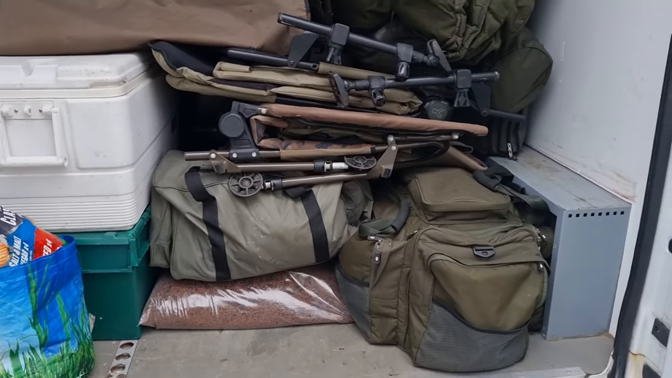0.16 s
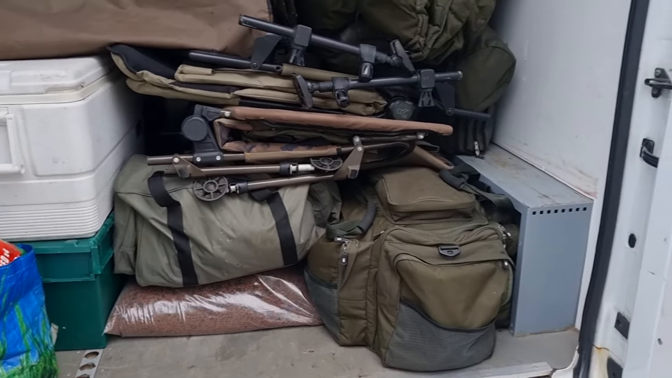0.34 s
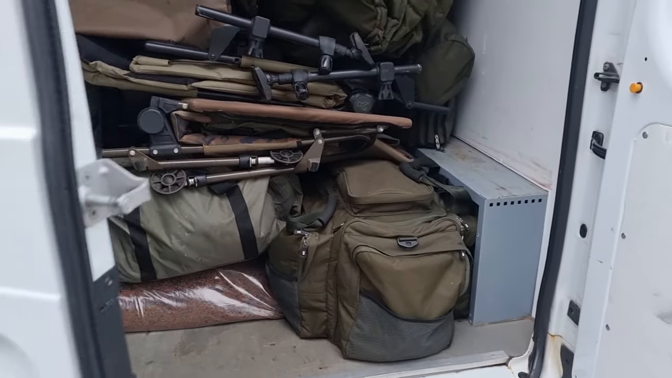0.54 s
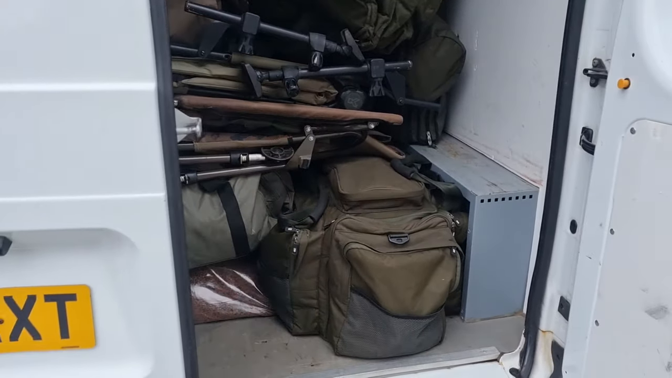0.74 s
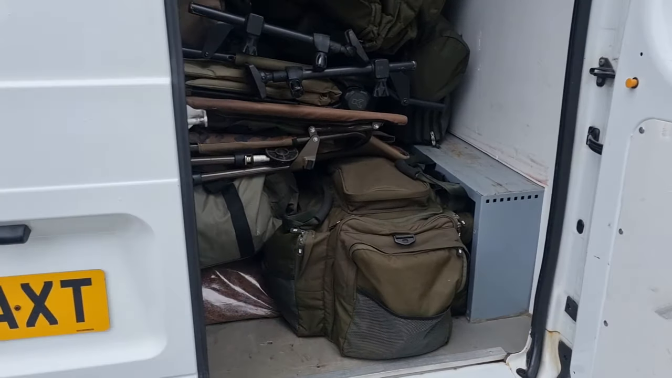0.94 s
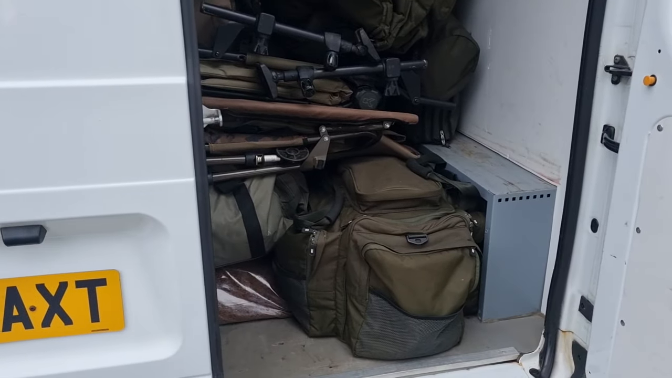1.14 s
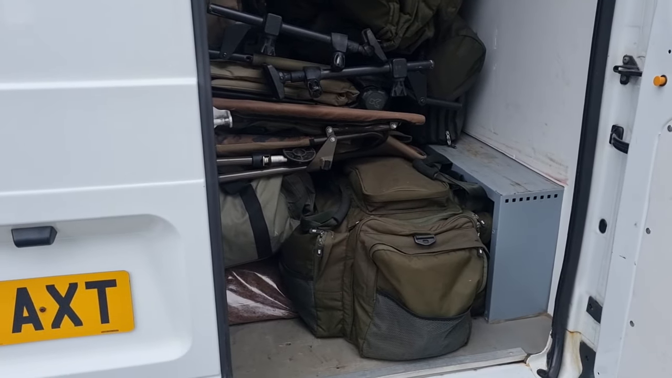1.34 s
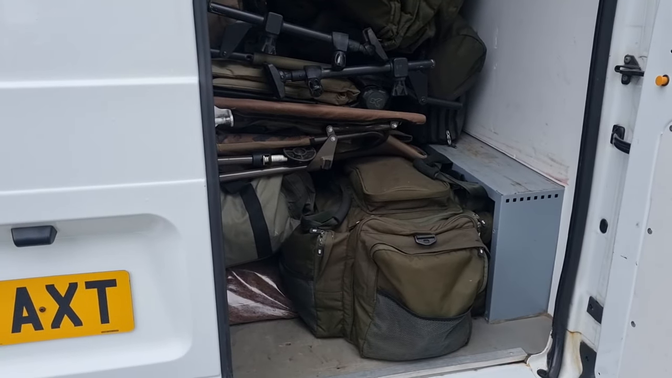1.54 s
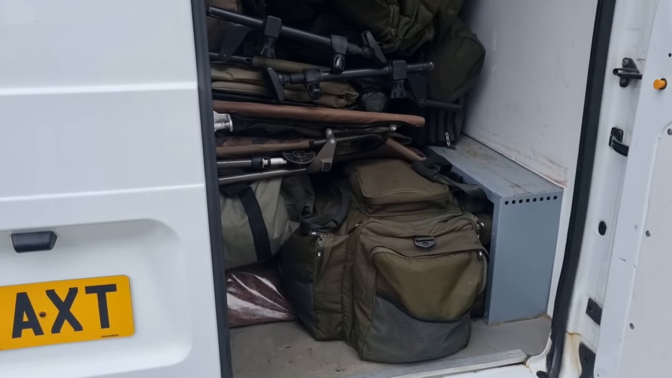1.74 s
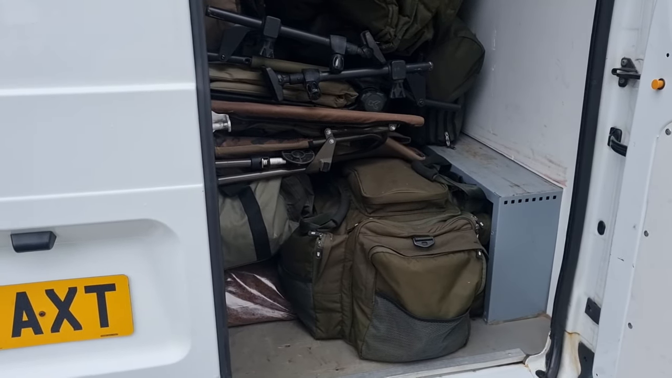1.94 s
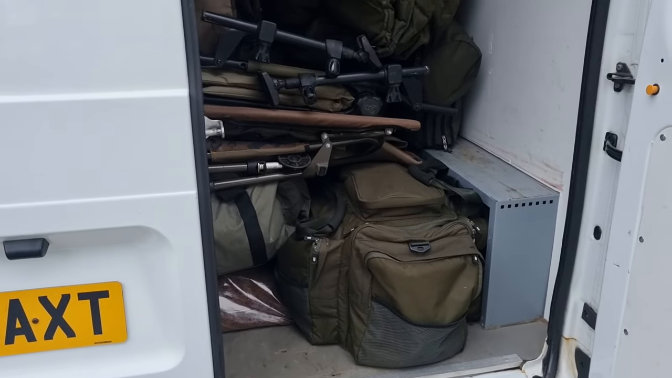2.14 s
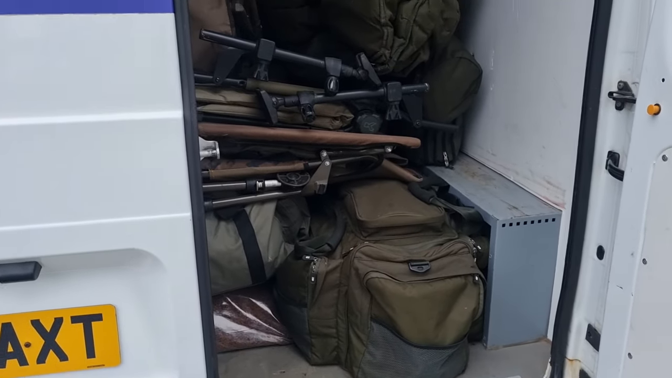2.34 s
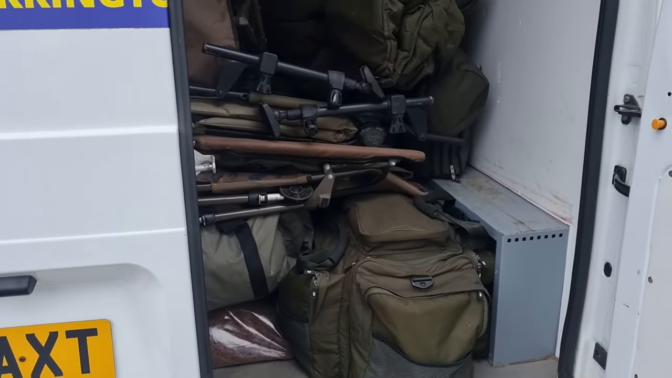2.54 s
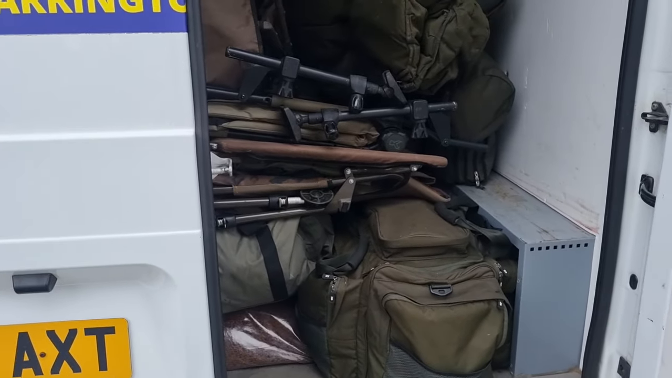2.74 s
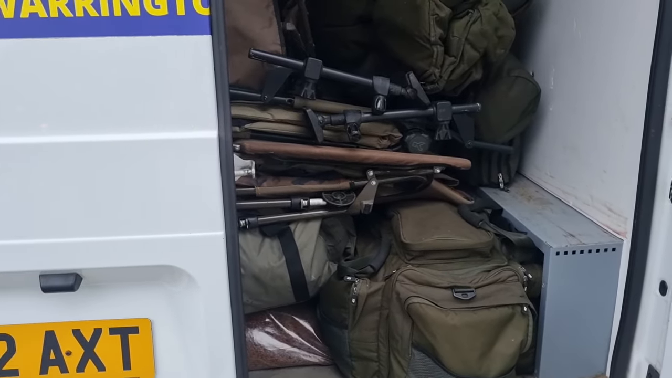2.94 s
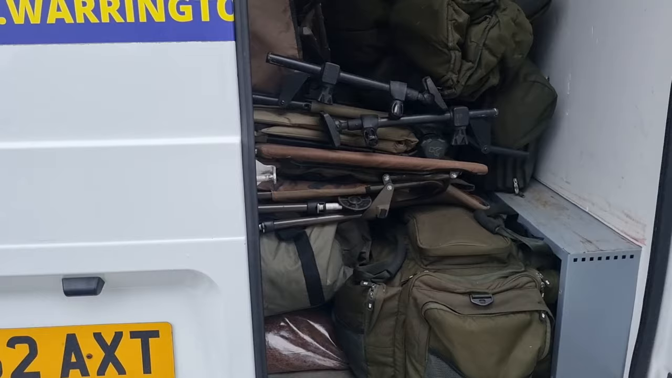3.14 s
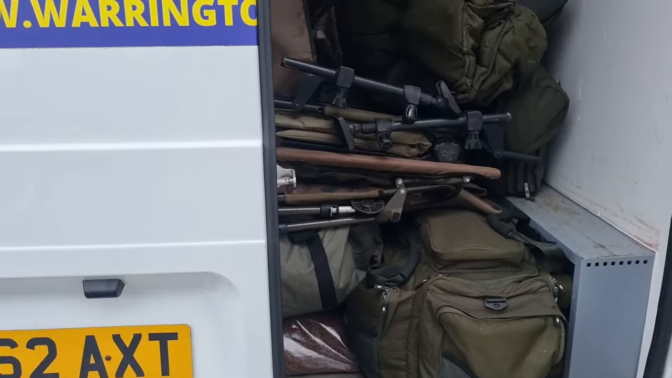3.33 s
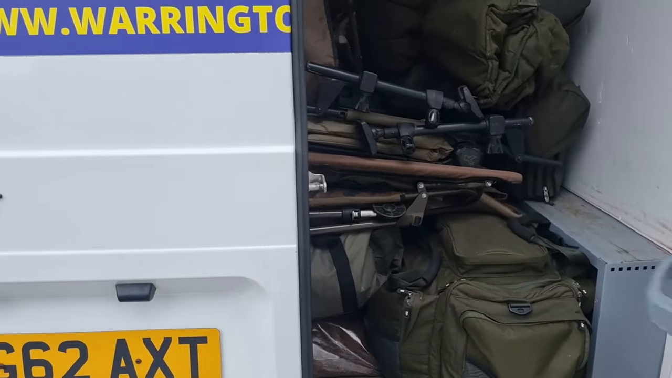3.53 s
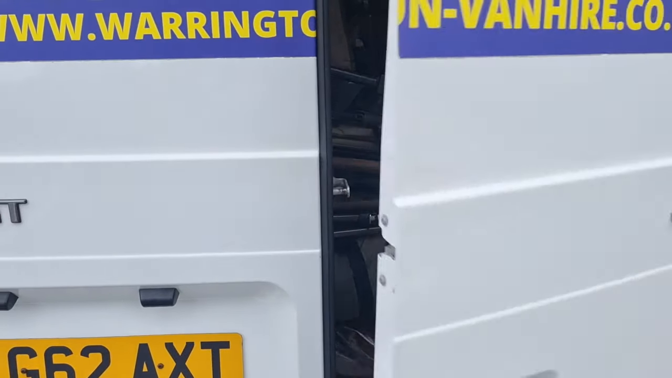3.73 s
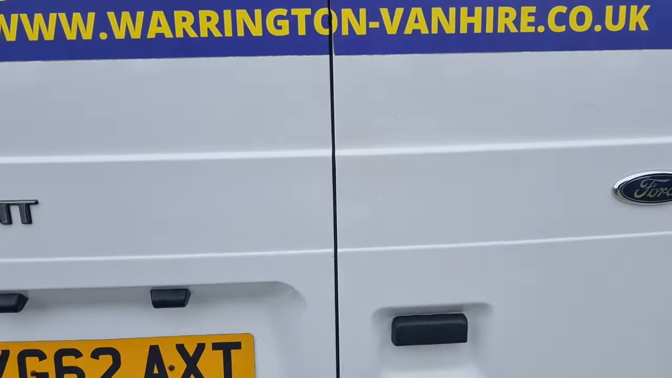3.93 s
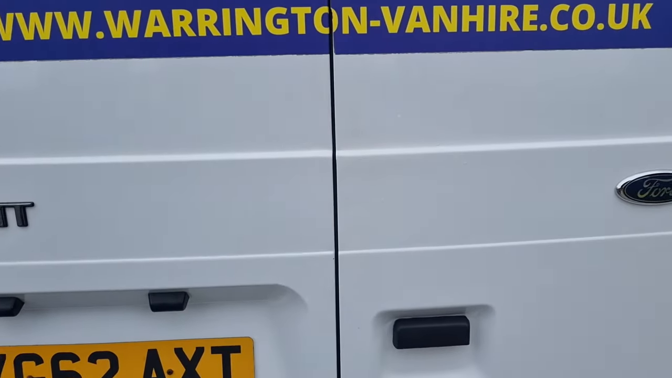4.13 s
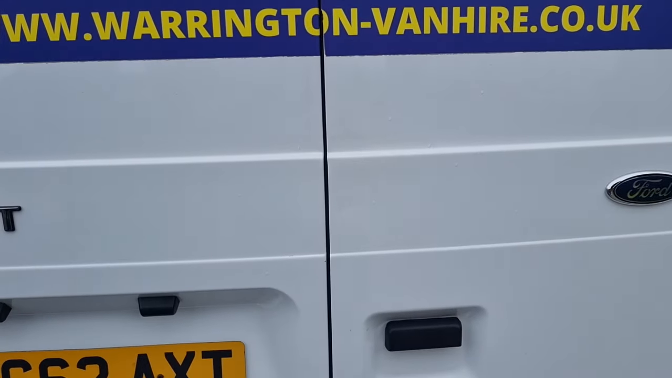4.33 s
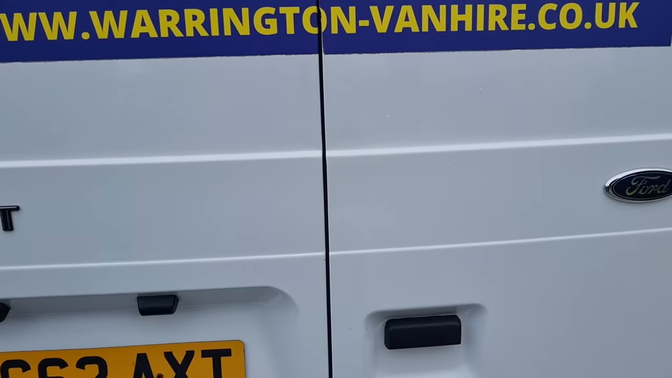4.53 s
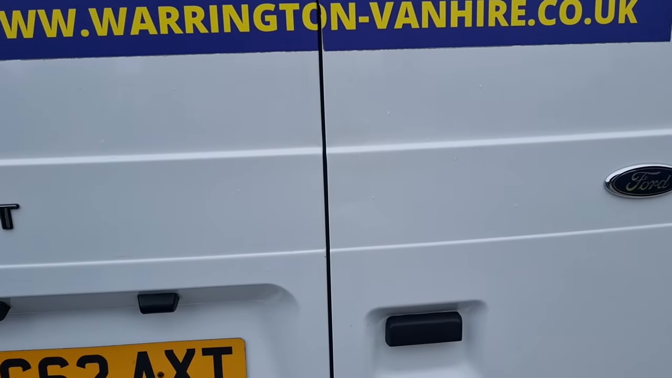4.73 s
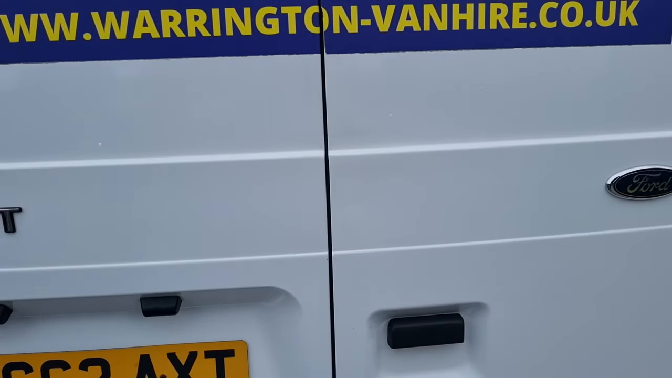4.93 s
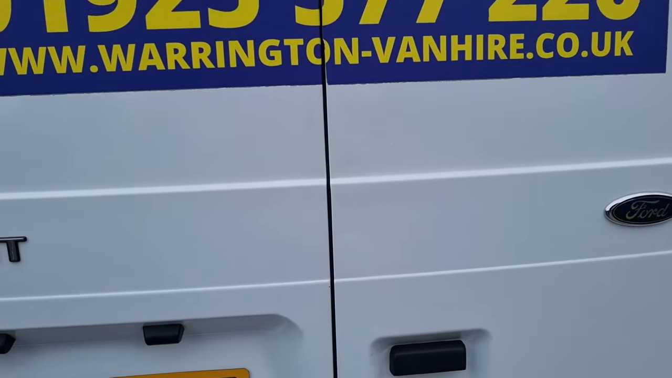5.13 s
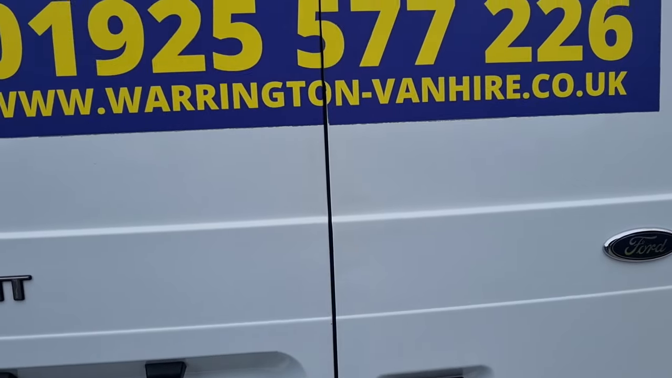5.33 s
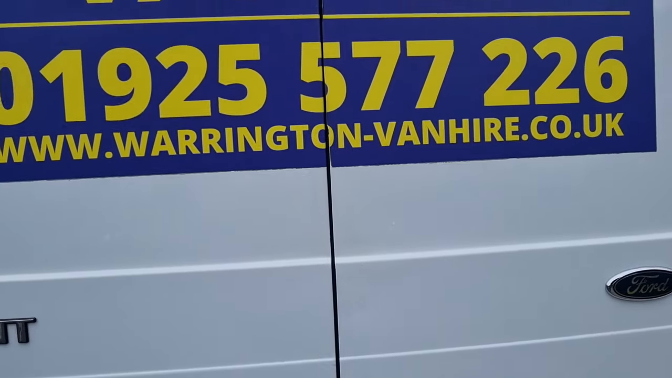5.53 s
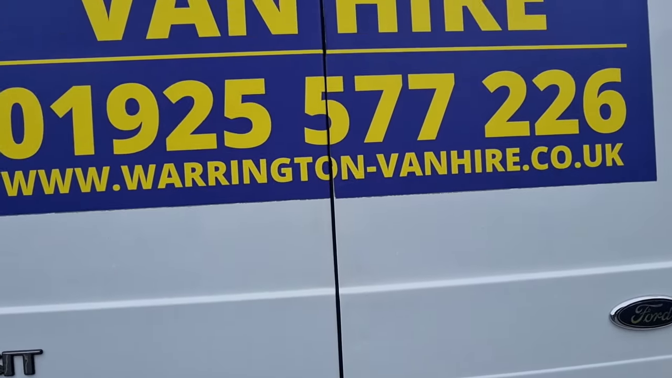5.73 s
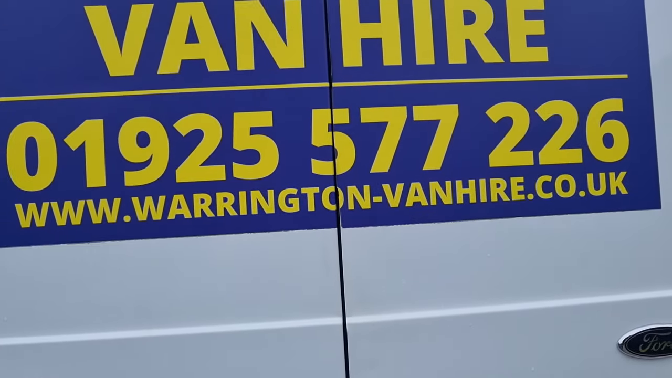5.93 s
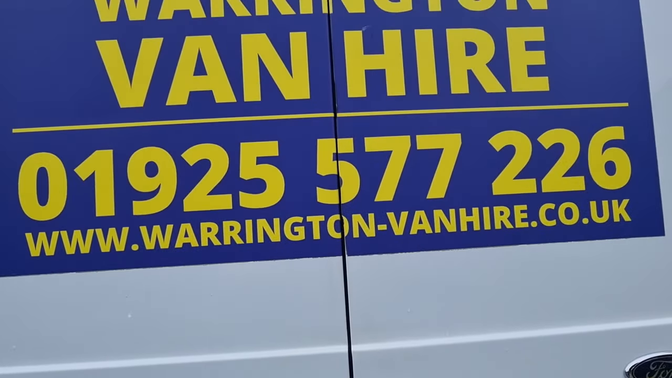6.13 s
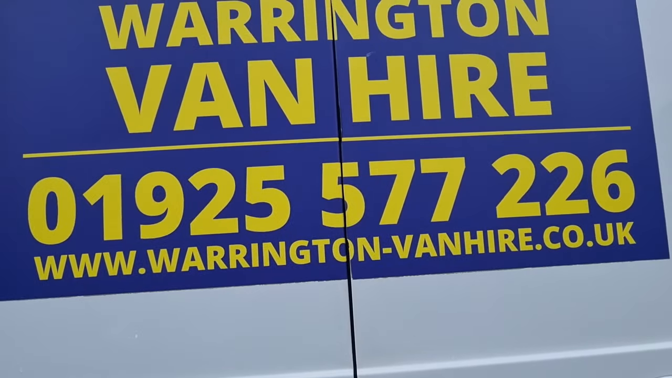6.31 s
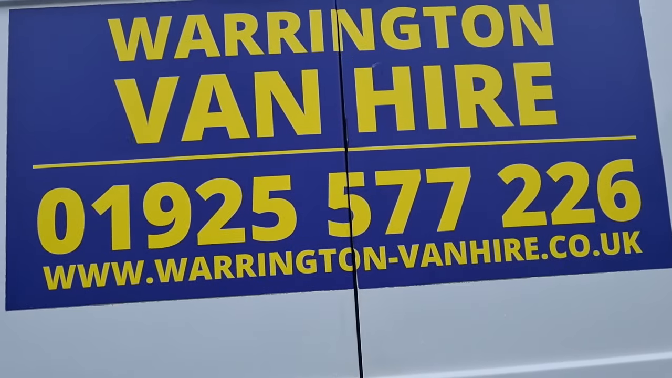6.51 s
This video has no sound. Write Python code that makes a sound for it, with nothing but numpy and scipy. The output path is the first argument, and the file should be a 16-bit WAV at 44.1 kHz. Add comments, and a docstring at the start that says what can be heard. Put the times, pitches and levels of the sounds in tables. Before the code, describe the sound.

Two close, booming van door slams with a short rattle, while an engine hums, traffic hisses and something like a brake squeals.

```python
"""You hear the two rear doors of a loaded van slam close by, first the left, then the right.
Each slam is a quick run of blows: the steel skin clatters, the latch snaps, the cargo box booms
and the load rattles. Behind them an engine hums, traffic hisses past with a thin whine,
and something like a brake squeals in short spells. The doors and the squeal echo off nearby walls."""
import sys
import numpy as np
from scipy import signal
from scipy.fft import rfft, irfft, next_fast_len
from scipy.io import wavfile

SR = 44100
rng = np.random.default_rng(int(sys.argv[2]) if len(sys.argv) > 2 else 0)


def unload_audio(sound):
    """Save the sound as a 16-bit wav file, at the path given as the first command line argument."""
    columns = np.transpose(np.atleast_2d(sound))
    # keep every value between -1 and 1, then stretch to whole-number steps
    steps = np.round(np.clip(columns, -1, 1) * 32767)
    wavfile.write(sys.argv[1], SR, steps.astype(np.int16))


N = 289737
TIME = np.arange(N) / SR


def amp(db):
    """Turns decibels (dB) into a number to multiply a sound by."""
    return 10 ** (np.asarray(db) / 20)


def evened(x):
    """Scales a sound to an average power of 1."""
    return x / np.sqrt(np.mean(x ** 2) + 1e-20)


def at_pitch(points, hz):
    """Reads between the rows of a (Hz, value) table, spacing octaves evenly."""
    pitches, values = np.transpose(points)
    return np.interp(np.log(hz + 1), np.log(pitches + 1), values)


def over_time(points):
    """Joins the rows of a (seconds, value) table with straight lines."""
    return np.interp(TIME, *np.transpose(points))


def add(mix, start, sound):
    """Mixes a sound in, start seconds from the beginning."""
    part = mix[:, round(start * SR):][:, :sound.shape[-1]]
    part += sound[..., :part.shape[1]]


def pan(db):
    """Left and right gains that make the left side db louder."""
    return amp(np.vstack([db / 2, -db / 2]))


def wander(size, hz):
    """A random wobble of size about 1 that moves up to hz times a second."""
    knots = rng.standard_normal(2048)
    return np.interp(np.arange(size) * 2 * hz / SR, np.arange(len(knots)), knots)


def fade(t, t60):
    """Dies away by 60 dB in t60 seconds, the ring time."""
    return np.exp(-np.log(1000) * t / t60)


def gate(t, length, attack, release):
    """Fades in smoothly, holds, then fades out; all times are in seconds."""
    return np.sin(np.pi / 2 * np.clip(np.minimum(t / attack, (length - t) / release), 0, 1)) ** 2


def soften(x, top_hz):
    """A cushioned contact loses its treble above top_hz."""
    return signal.lfilter(*signal.butter(2, min(top_hz / SR * 2, .95)), x)


def peaked(x, peaks):
    """Makes a sound louder around a few pitches, as a resonance does."""
    hz = np.fft.rfftfreq(N, 1 / SR)
    lift_db = sum(db / (1 + (2 * (hz - centre) / width) ** 2) for centre, width, db in peaks)
    return irfft(rfft(x) * amp(lift_db), N)


def noise(colour, size):
    """Stereo noise whose colour (level at each pitch) is given; both sides are alike in the bass."""
    # Each row: pitch in Hz, how alike the sides are (1 the same, 0 unrelated, -1 opposite).
    likeness = [(60, 0.74), (130, 0.94), (290, 0.72), (600, -0.48), (1400, -0.51), (3000, 0.049),
                (15000, 0)]
    length = next_fast_len(size)
    hz = np.fft.rfftfreq(length, 1 / SR)
    left, unrelated = rfft(rng.standard_normal((2, length)))
    same = np.clip(at_pitch(likeness, hz), -1, 1)
    right = same * left + np.sqrt(1 - same ** 2) * unrelated
    spectrum = np.array([left, right]) * amp(at_pitch(colour, hz))
    return evened(irfft(spectrum, length)[:, :size])


def ring(colour, t60s, rise, size=SR):
    """One blow sets off countless tones; each octave dies as the (Hz, ring time) rows of t60s say."""
    t = np.arange(size) / SR
    octave = np.log2(np.clip(np.fft.rfftfreq(size, 1 / SR), 32, 16384))
    spectrum, out = rfft(noise(colour, size)), 0
    for k in range(5, 15):
        band = irfft(spectrum * np.maximum(1 - abs(octave - k), 0), size)
        out = out + band * fade(t, at_pitch(t60s, 2. ** k))
    return out * (1 - np.exp(-t / rise))


def wall_echo(x):
    """The surrounding walls throw a sound back as a smooth wash."""
    # Each row: pitch in Hz, ring time of the echo in seconds.
    echo_times = [(100, 1.0), (400, 0.97), (1500, 0.23), (3300, 0.25), (8000, .45), (16000, 0.16)]
    tail = ring([(20, 0.0024), (16000, 0.0017)], echo_times, rise=0.0083)
    return signal.fftconvolve(x, tail / np.linalg.norm(tail[0]), axes=1)[:, :N]


def traffic():
    """Rumble, tyre roar and spray swell and fade with each vehicle's distance; spray fades fastest."""
    # Colours of the three noises. Each row: pitch in Hz, relative level in dB.
    rumble = [(15, -2), (35, 10.5), (70, 15), (110, 11.5), (170, -3), (280, 3.5), (400, -13), (800, -45)]
    roar = [(150, -7.5), (450, 0), (650, -0.5), (950, 0), (1400, -5), (2200, -8), (3200, -16.5),
            (4500, -23), (7000, -26.5), (9000, -37.5), (16000, -71)]
    spray = [(600, -29), (1700, -2.5), (2200, -2.5), (2800, -0.5), (3600, -4), (4800, -9), (7200, -10.5),
             (9000, -25.5), (11000, -23.5), (14000, -21), (16000, -32)]
    # Vehicles. Each row: time when nearest, approach time and base leaving time in seconds,
    # then rumble, roar and spray in dB.
    passes = [(0, .3, 0.36, -41.5, -44.5, -55), (.55, 0.17, 0.23, -45, -39, -39.5),
              (.88, 0.28, 0.21, -41, -35, -38), (1.6, .3, 0.91, -40, -46, -62),
              (3.35, .3, 0.28, -52, -53, -61), (6.4, .7, .7, -49, -48, -74)]
    # Hollow resonances that colour the traffic. Each row: pitch in Hz, width in Hz, lift in dB.
    hollows = [(147, 18, 2.5), (240, 9.9, 6), (335, 19, 7), (501, 21, 4.5), (852, 22, 6.5), (1217, 70, 2),
               (1397, 28, 6.5), (2770, 240, 1), (4100, 340, 1.5)]
    # Where the traffic lies. Each row: time in seconds, left minus right in dB.
    sides = [(0, 1.5), (0.7, 3), (2.2, -0.7), (6.57, -1.3)]
    road = 0
    for k, (colour, far_db, falloff, linger) in enumerate(
            [(rumble, -55, 0.89, 0.87), (roar, -57, 1.116, 1.067), (spray, -94, 2.66, 1.67)]):
        power = amp(far_db) ** 2  # steady distant traffic
        for nearest, approach, leaving, *db in passes:
            span = np.where(TIME < nearest, approach, leaving * linger)
            distance = np.hypot(1, (TIME - nearest) / span)
            power = power + (amp(db[k]) / distance ** falloff) ** 2
        road = road + np.sqrt(power) * amp(1.3 * wander(N, 12)) * noise(colour, N)
    return amp(-1.28) * pan(over_time(sides)) * peaked(road, hollows)


def whines():
    """Passing vehicles whine and drone: narrow bands of noise swell, slide in pitch and fade."""
    # Each row: start and length in seconds, pitch in Hz, slide in Hz per second, level in dB,
    # width in Hz.
    bands = [(0, 0.82, 402, 24, -49, 120), (0.28, 1.18, 2800, 0.5, -49, 410),
             (0.2, 0.66, 4200, 0, -53, 350), (0.76, 0.33, 424, 44, -35.5, 13.9),
             (1.25, 1.75, 15650, -330, -72, 200), (1.25, 1.36, 7160, -190, -68, 95),
             (1.54, 1.53, 314.5, -20, -54.5, 40), (1.8, 1.43, 1190, -30, -56.5, 200),
             (4.28, .28, 4540, 1302, -67, 160), (6, 1.2, 222, 2.5, -56.5, 9.87),
             (5.5, 1.06, 1412, -9.5, -54.5, 24), (5.5, 1.66, 895, -9, -57.5, 35),
             (6, .7, 2450, 83, -61, 90), (5.6, 1.3, 86, 12, -51.5, 8.3)]
    out = np.zeros((2, N))
    for start, length, hz, glide, db, width in bands:
        t = np.arange(0, length, 1 / SR)
        fuzz = wander(len(t), width / 2) + 1j * wander(len(t), width / 2)  # smears a tone into a band
        lag = np.array([[1.78], [0]]) * min(hz / 800, 1)  # radians between the microphones
        angle = 2 * np.pi * np.cumsum(hz + glide * t) / SR
        tone = evened((fuzz * np.exp(1j * (angle + lag))).real)
        add(out, start, amp(db) * gate(t, length, attack=0.21 * length, release=0.21 * length) * tone)
    return out


def engine():
    """The firing of a nearby engine makes a low hum that swells; in one swell the pitch clearly dips."""
    # The idle. Each row: time in seconds, firing rate in Hz.
    idle_rates = [(0, 73.96), (.8, 72.97), (2.1, 67.36), (3.5, 68.58), (5.1, 74.36), (6.57, 75)]
    # Each row: time of the peak and half length in seconds, level in dB, slide in Hz per second.
    swells = [(.02, 0.087, -39.5, 0), (0.252, 0.1, -31, 0), (.45, 0.054, -32, 0), (0.6, 0.073, -35.5, -0.5),
              (1.574, .13, -26, -45), (3.304, 0.31, -42, 0), (3.93, 0.11, -45, 0), (4.62, 0.28, -43, 0)]
    # Tones of the hum. Each row: multiple of the firing rate, relative level in dB.
    harmonics = [(1, 2), (2, -4.5), (3, -12.5), (4, -18)]
    hz, idle = over_time(idle_rates), amp(-49)
    level = idle
    for peak, half, db, glide in swells:
        offset = (TIME - peak) / half
        level = level + amp(db) * np.exp(-offset ** 2)
        settle = np.exp(-np.maximum(offset - 1, 0) ** 2)  # brings the pitch back to idle
        hz = hz + glide * half * np.maximum(offset + 1, 0) * settle
    angle = 2 * np.pi * np.cumsum(hz * (1 + .012 * wander(N, 6.1))) / SR
    firing, *overtones = [amp(db + 1.3 * wander(N, 4.8)) * np.sin(k * angle) for k, db in harmonics]
    # the swells lift the firing tone more than its overtones
    return level * firing + np.sqrt(idle * level) * sum(overtones)


def whistle(hz, harmonics_db, jitter, flutter_db, rate_hz):
    """A nearly pure tone that wavers in pitch (jitter) and in strength (flutter)."""
    angle = 2 * np.pi * np.cumsum(hz * (1 + jitter * wander(len(hz), rate_hz))) / SR
    lag = np.array([[2.2], [0]])  # radians between the microphones
    tone = sum(amp(db) * np.sin(k * angle + lag) for k, db in enumerate(harmonics_db, 1))
    return evened(tone) * amp(flutter_db * wander(len(hz), rate_hz))


def brake():
    """Each bite of the brake sets off a squeal whose pitch sinks as the grip tightens."""
    # Each row: start and length in seconds, pitch at full grip in Hz, level in dB.
    squeals = [(2.57, 0.12, 3295, -49), (2.66, 0.055, 3177, -30.5), (2.695, .065, 3200, -36),
               (2.742, 0.047, 3110, -27.5), (2.78, 0.052, 3134, -30.5), (2.816, .22, 3230, -58.5),
               (3.52, 0.065, 3310, -49), (3.72, .1, 3350, -59), (3.787, 0.059, 3170, -35.5),
               (3.845, .11, 3162, -34.5), (3.95, .06, 3187, -45), (4.558, 0.12, 3318, -47),
               (4.66, 0.16, 3312, -46), (4.81, 0.24, 3312, -63.5)]
    out = np.zeros((2, N))
    for start, length, hz, db in squeals:
        t = np.arange(0, length, 1 / SR)
        grip = gate(t, length, attack=0.026, release=0.025)
        pitch = hz * (1 + 0.015 * (1 - grip))
        tone = whistle(pitch, [6.5, -19.5, -34.5, -49], jitter=0.0027, flutter_db=2.7, rate_hz=44.6)
        add(out, start, amp(db) * grip * tone)
    return out


def snap(t60):
    """A gritty crack and a short ring, as when small steel parts chatter against each other."""
    # Colour of the crack, then tones of the steel. Each row: pitch in Hz, relative level in dB.
    crack_colour = [(400, -12), (1000, 2.5), (2000, 11), (3500, 1.5), (5000, 3.5), (7300, 5.5), (9500, -8),
                    (11500, -2), (13500, 5), (16000, -6.5)]
    steel_tones = [(1950, -2.5), (2480, -8.5), (6000, 0), (6600, -4), (7280, 3), (13850, -12.5)]
    t = np.arange(SR // 4) / SR
    crack = evened(noise(crack_colour, len(t)) * amp(3 * wander(len(t), 500))) * fade(t, t60)
    tones = sum(amp(db) * np.sin(2 * np.pi * (hz * t + rng.random((2, 1)))) for hz, db in steel_tones)
    ringing = amp(-19) * tones * fade(t, 1.2 * t60)
    return (crack + ringing) * (1 - np.exp(-t / 0.00049))


def ticks_and_scuffs():
    """Small sharp ticks around the slams, then three soft, dull scuffs, a little to the left."""
    # Each row: start in seconds, level in dB, ring time in seconds, treble limit in Hz.
    touches = [(1.337, -49.5, 0.41, 15000), (2.029, -34, 0.014, 8950), (2.095, -47, 0.017, 12000),
               (2.1318, -32, 0.013, 15000), (2.592, -52, .08, 7000), (3.0163, -55, 0.12, 14000),
               (3.0795, -54, 0.092, 15000), (3.418, -46, 0.12, 6000), (3.4218, -32.5, 0.1, 15500),
               (3.956, -62.5, 0.069, 14000), (5.291, -64, .06, 5000), (5.39, -52.5, 0.17, 5000),
               (5.57, -63, 0.046, 5000)]
    out = np.zeros((2, N))
    for start, db, t60, top_hz in touches:
        add(out, start, amp(db) * pan(4.1) * soften(snap(t60), top_hz))
    return out


def air_thumps():
    """A closing door squeezes the air into a short, deep thump."""
    # Each row: start in seconds, level in dB, pitch in Hz, ring time in seconds.
    thumps = [(0.956, -5.5, 57.6, 0.15), (4.055, -11.5, 74, 0.22), (4.1028, -2, 58.4, 0.12)]
    out, t = np.zeros((2, N)), np.arange(SR // 2) / SR
    for start, db, hz, t60 in thumps:
        add(out, start, -amp(db) * np.sin(2 * np.pi * hz * t) * fade(t, t60))
    return out


def van_body(tones, t60, damping, rise):
    """The van rings at its own pitches: t60 holds at 100 Hz, and damping makes higher ones die sooner."""
    t, out = np.arange(SR) / SR, 0
    for k, (hz, db) in enumerate(tones):
        # higher tones reach the two microphones out of step
        lag = (-1) ** k * np.array([[1], [-1]]) * np.pi / 4 * min(hz / 540, 1) ** 2
        out = out + amp(db) * np.sin(2 * np.pi * hz * t + lag) * fade(t, t60 * (100 / hz) ** damping)
    return out * (1 - np.exp(-t / rise))


def door(blows, box, skin, body, box_t60, skin_t60, box_db):
    """Every blow shakes the cargo box, the door skin and the latch; cushioned blows lose their treble."""
    out = np.zeros((2, N))
    box_times = [(60, box_t60), (200, 0.83), (450, .5)]
    skin_times = [(400, skin_t60), (1500, 0.24), (7000, 0.15)]
    for start, boom_db, skin_db, latch_db, latch_t60, top_hz, side_db in blows:
        boom = amp(box_db) * ring(box, box_times, rise=0.0034) + body
        add(out, start, amp(boom_db) * boom)
        clatter = amp(skin_db) * ring(skin, skin_times, rise=0.00074, size=SR // 2)
        add(clatter, 0, amp(latch_db) * pan(side_db) * snap(latch_t60))
        add(out, start, soften(clatter, top_hz))
    return out


def slams():
    """The left door slams, then the right; each makes the van ring in its own way."""
    # Each row: start in seconds, levels of box, skin and latch in dB, latch ring time in seconds,
    # treble limit in Hz, latch left minus right in dB.
    left_blows = [(0.9388, -22, -8.5, -21, 0.3, 3570, -2.5), (0.9557, -19, -11, -23, 0.28, 14000, 2),
                  (0.9790, -15.5, -14.5, -25.5, 0.16, 13000, 2.5),
                  (0.9962, -26, -16.5, -13, 0.069, 16000, 1.5),
                  (1.0170, -12, -47, -35.5, 0.093, 12000, -6.5), (1.0255, -32, -38.5, -27.5, .04, 12000, 2),
                  (1.0315, -23.5, -14, -44.5, .07, 2480, -3), (1.0545, -21.5, -33.5, -25, 0.034, 15100, 3),
                  (1.0889, -20, -43, -22, 0.03, 16000, 4), (1.1120, -25.5, -54, -34, 0.033, 14000, 2),
                  (1.1480, -28.5, -43, -58, 0.048, 1500, 0)]
    right_blows = [(4.0438, -48, -16, -34, 0.045, 2330, 1), (4.0592, -17, -10, -23.5, 0.1, 8950, -2),
                   (4.0715, -20.5, -21, -21.5, 0.076, 17100, -1),
                   (4.1050, -22, -16, -26.5, 0.057, 5000, -12), (4.1200, -15, -45, -51, .1, 14000, 4),
                   (4.1745, -15.5, -40, -33, 0.099, 6500, -5),
                   (4.1979, -21, -28.5, -24.5, 0.057, 4000, -3.5), (4.2189, -21, -36, -32, 0.062, 2990, -1),
                   (4.2355, -21.5, -29, -37, .08, 6500, -8),
                   (4.2593, -24.5, -36.5, -35.5, 0.056, 9400, -6.5), (4.2730, -26, -52, -64, .05, 1000, 0)]
    # The strongest tones of the van's body. Each row: pitch in Hz, relative level in dB.
    left_tones = [(59.9, -8), (73.3, -0.5), (92.2, 1), (113.0, -15), (132.2, -4.5), (152.4, -4.5),
                  (166.2, -8.5), (205.2, -15), (230.8, -17.5), (249.3, -16), (327.0, 1.5), (375.1, 0.5),
                  (417.5, -20), (514.8, -3), (579.7, -6.5), (816.2, -21), (849.2, -9.5), (1063.2, -13),
                  (1139.2, -24.5), (1499.6, -7), (1986.4, -12)]
    right_tones = [(32.0, -16), (59.2, -6.5), (95.2, -8), (111.4, -11), (136.6, -4.5), (175.6, -4),
                   (193.5, -2), (206.9, -3.5), (235.5, -15), (313.6, -12), (349.2, -16), (380.2, -31),
                   (518.8, -20), (717.7, -11), (818.9, -14), (926.3, -32), (1032.9, -34), (1070.6, -31),
                   (1395.6, -28)]
    # Colours of the booming box and the steel skin. Each row: pitch in Hz, relative level in dB.
    left_box = [(20, -22.5), (45, -18.5), (65, 2), (100, 6), (170, 1), (270, -0.5), (370, 2), (470, -1.5),
                (900, -58)]
    right_box = [(20, -9), (35, 2), (60, -3), (115, 4.5), (190, 0.5), (260, -12), (340, -7), (470, -22.5),
                 (900, -74)]
    left_skin = [(100, -7.5), (350, -4), (600, 0.5), (1100, 2.5), (1600, -5.5), (2500, -12), (4000, -12),
                 (7000, -20.5), (10000, -20.5)]
    right_skin = [(100, 5), (450, -6), (720, -1), (950, 2.5), (1200, -4.5), (1600, -8), (2500, -12.5),
                  (4500, -20), (6800, -22), (10000, -26)]
    left_body = van_body(left_tones, t60=0.79, damping=0.67, rise=.006)
    right_body = van_body(right_tones, t60=0.75, damping=0.87, rise=0.0088)
    left = door(left_blows, left_box, left_skin, left_body, box_t60=1.0, skin_t60=0.22, box_db=-0.5)
    right = door(right_blows, right_box, right_skin, right_body, box_t60=0.34, skin_t60=0.34, box_db=-1)
    return left + right


def scene():
    """The van is close and has little echo; the squeal is farther off and echoes more."""
    close_by = slams() + air_thumps() + ticks_and_scuffs()
    squeal = pan(-1.9) * brake()
    echoes = amp(-19.5) * wall_echo(close_by) + amp(-8.5) * wall_echo(squeal)
    return close_by + squeal + echoes + engine() + traffic() + whines()


def record(dry):
    """The microphone openings lift the treble, the loudest peaks flatten, and the very top is cut off."""
    # Resonance of each opening, left then right. Each row: pitch in Hz, width in Hz, lift in dB.
    ports = [(14700, 3100, 11), (13600, 1750, 6.5)]
    clipped = np.clip([peaked(side, [port]) for side, port in zip(dry, ports)], -1, 1)
    low_pass = signal.firwin(511, cutoff=16250, window=("kaiser", 9), fs=SR)
    return signal.oaconvolve(clipped, low_pass[None], "same")


dry = scene()
out = record(dry)
unload_audio(out)
```